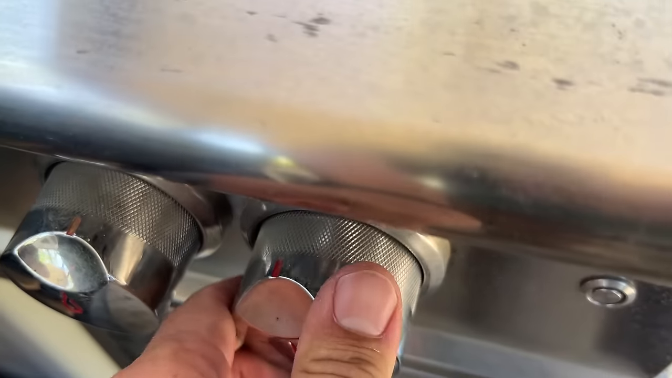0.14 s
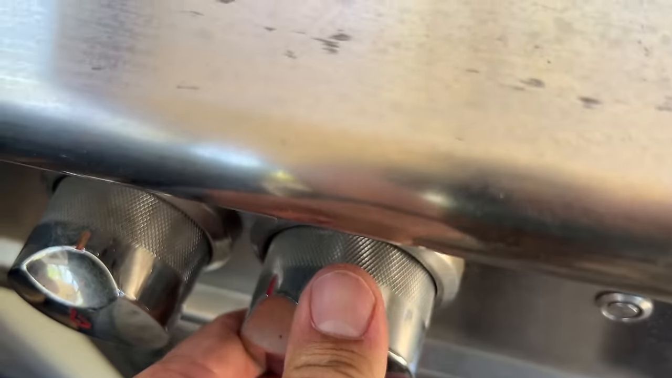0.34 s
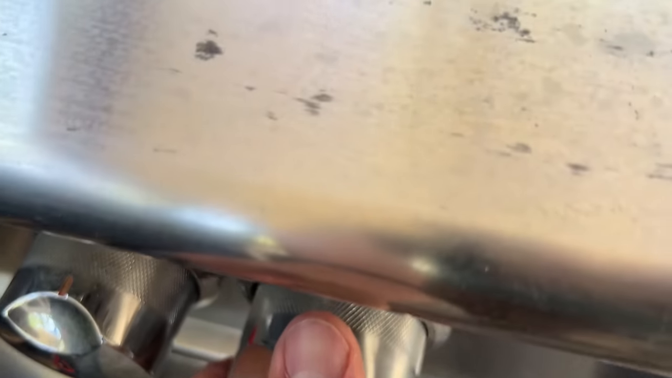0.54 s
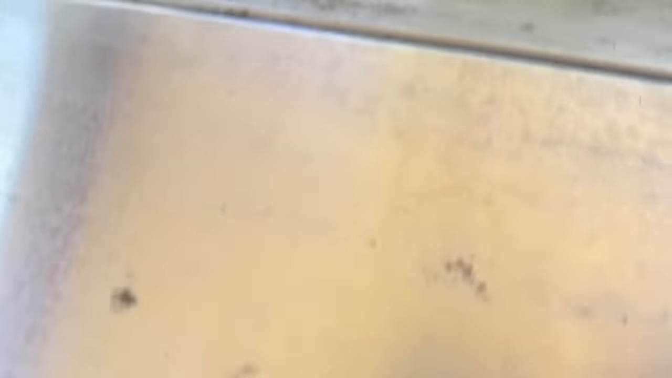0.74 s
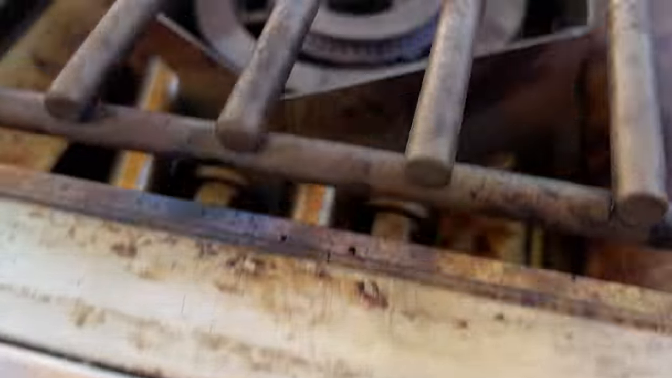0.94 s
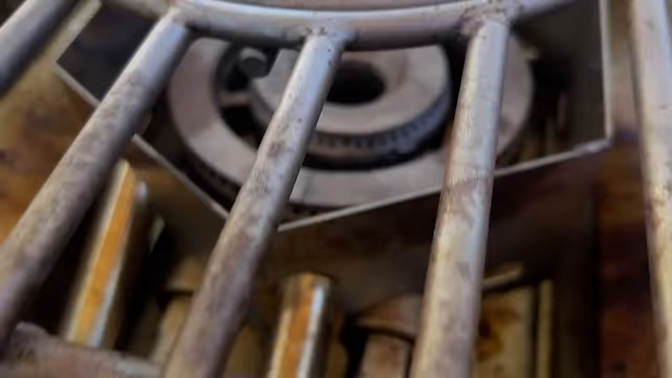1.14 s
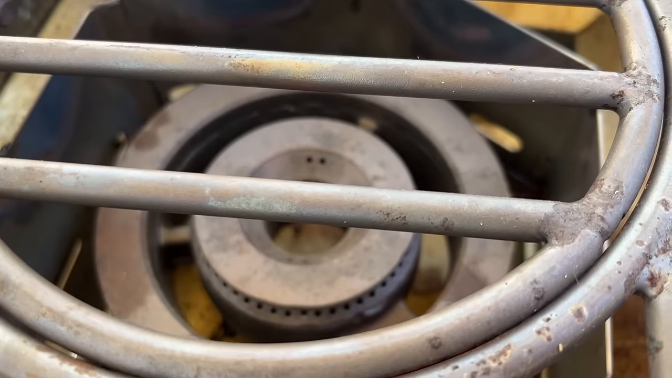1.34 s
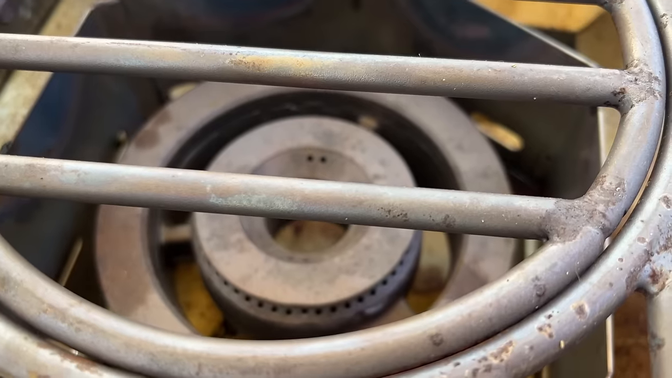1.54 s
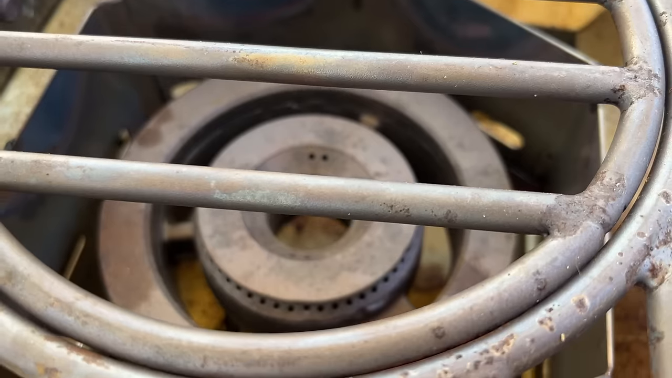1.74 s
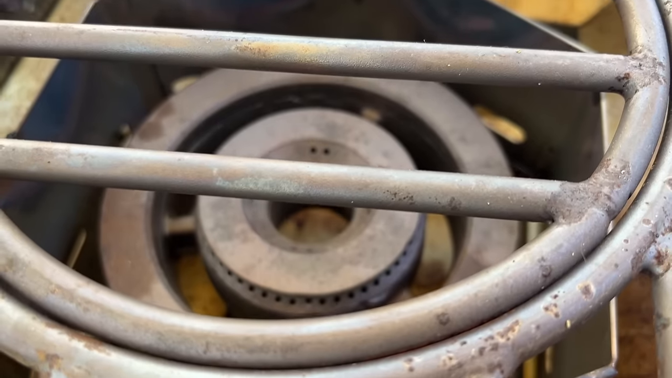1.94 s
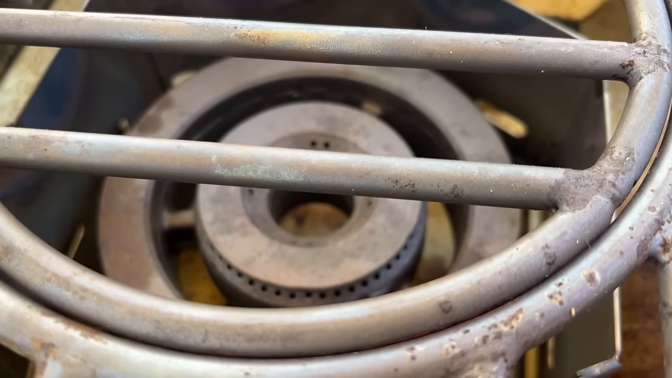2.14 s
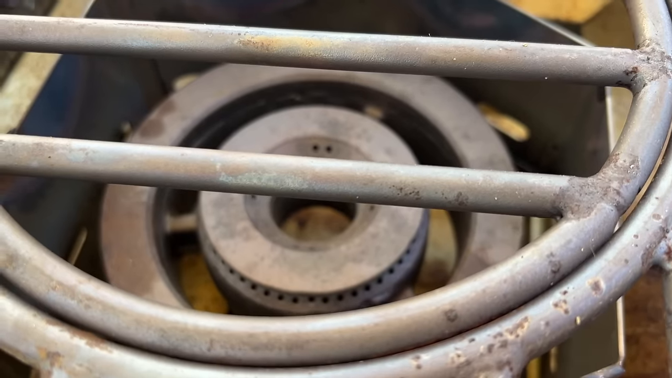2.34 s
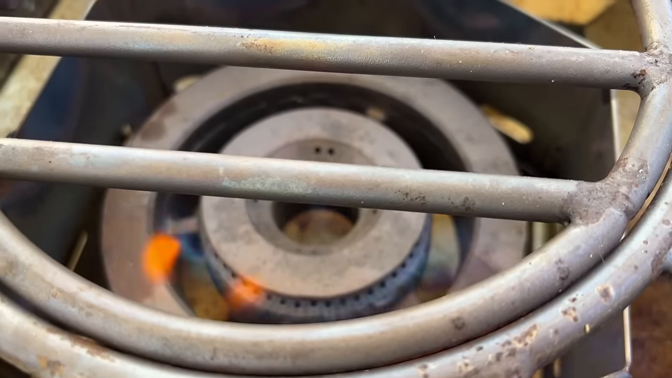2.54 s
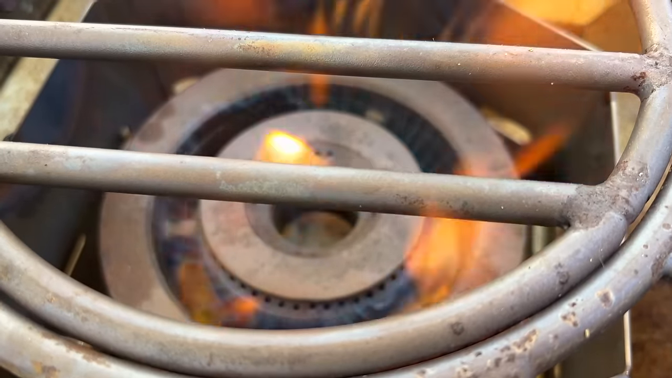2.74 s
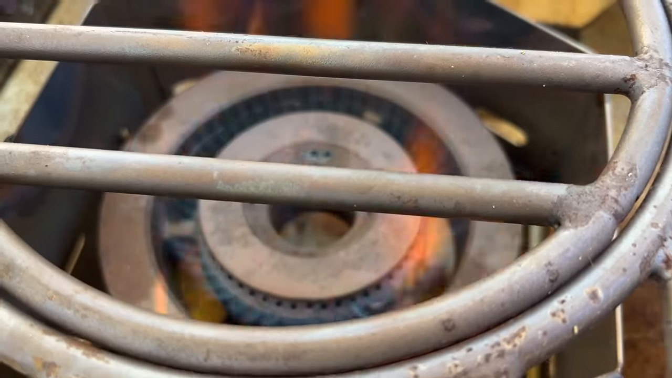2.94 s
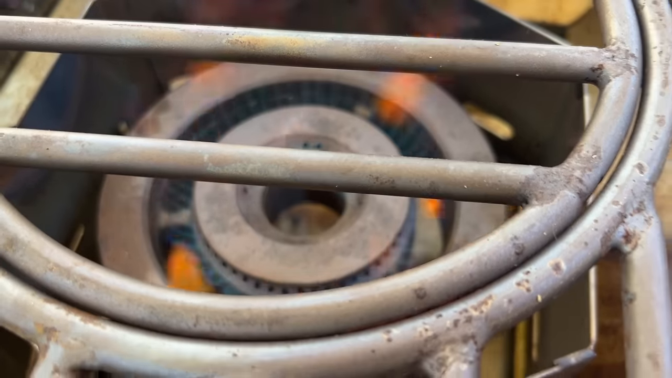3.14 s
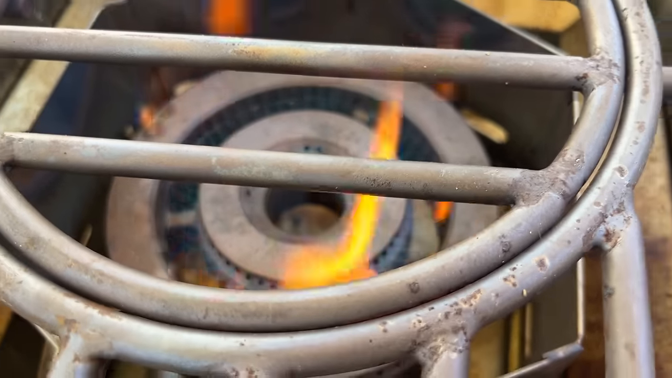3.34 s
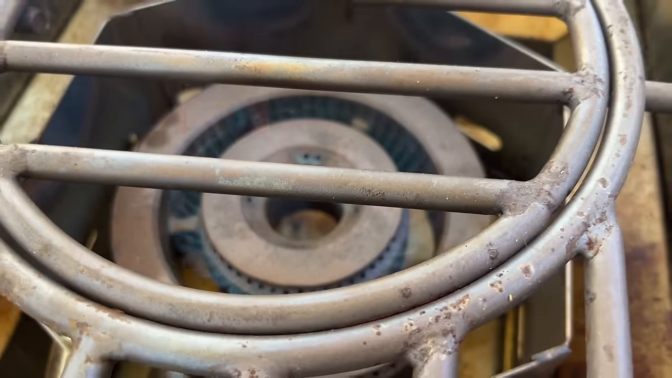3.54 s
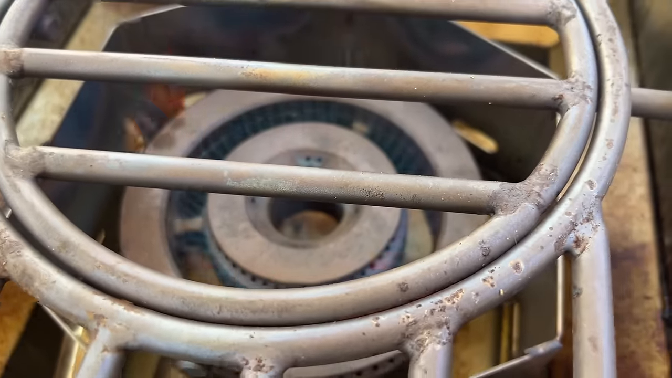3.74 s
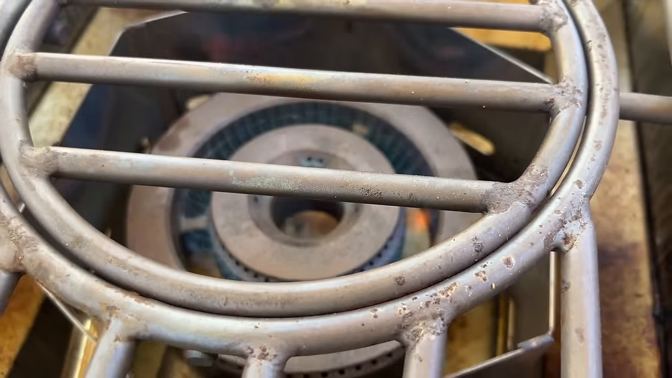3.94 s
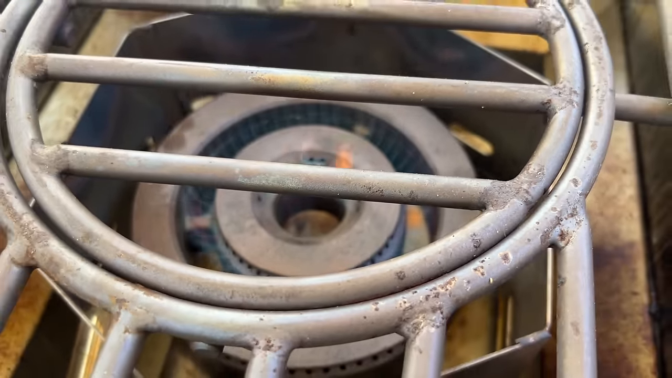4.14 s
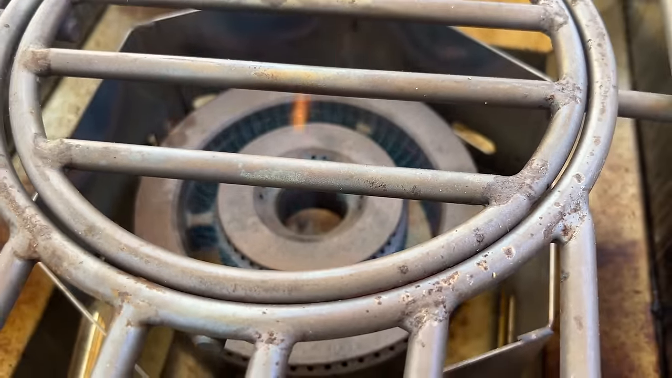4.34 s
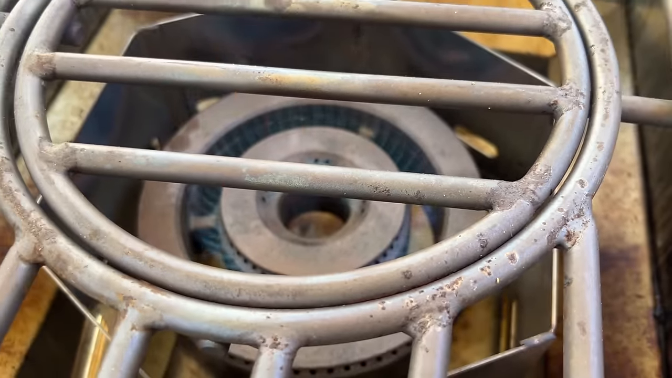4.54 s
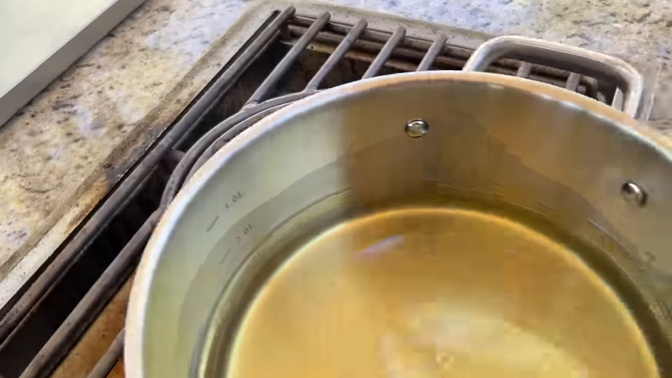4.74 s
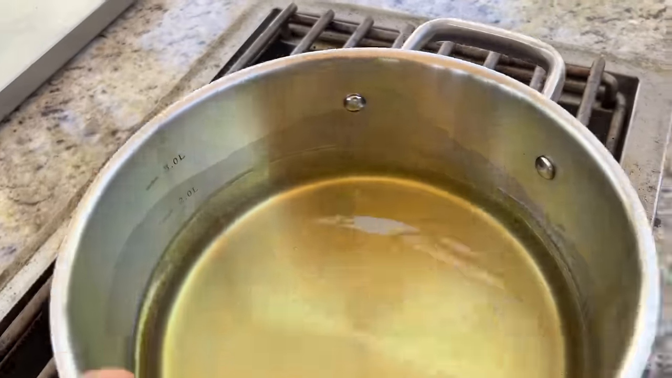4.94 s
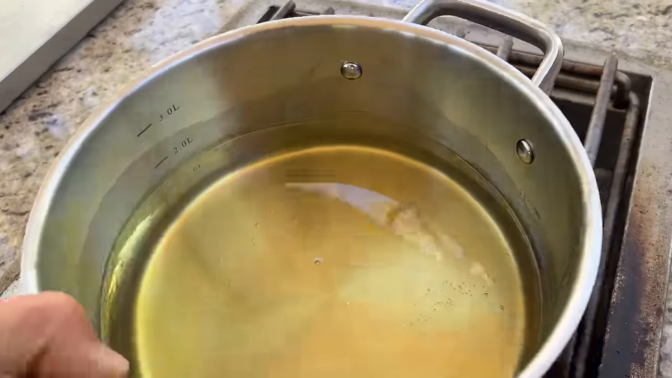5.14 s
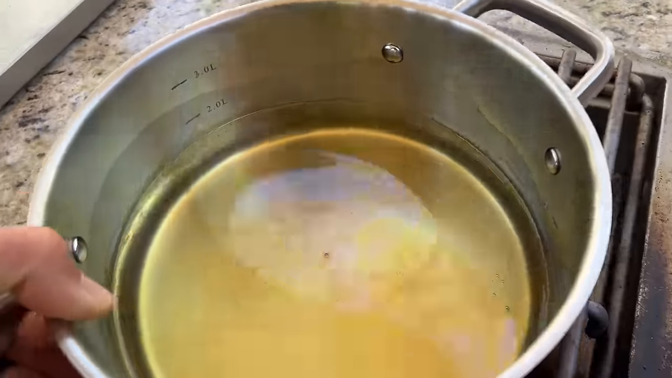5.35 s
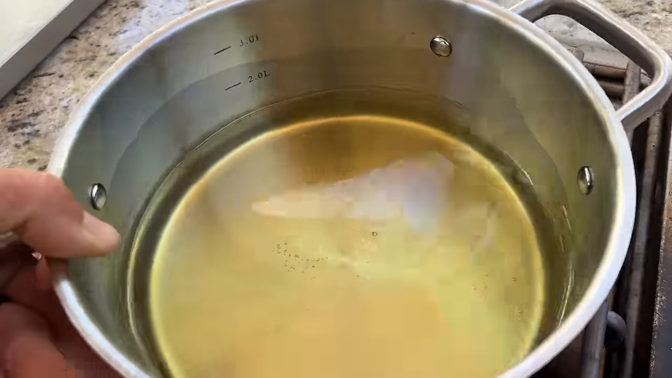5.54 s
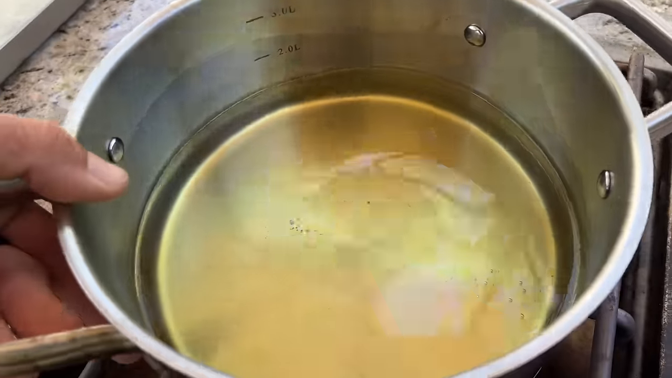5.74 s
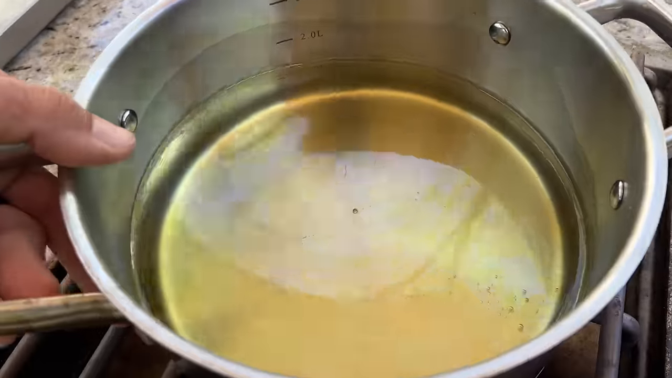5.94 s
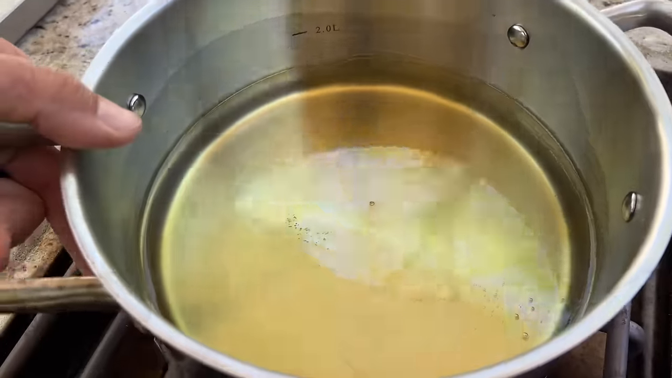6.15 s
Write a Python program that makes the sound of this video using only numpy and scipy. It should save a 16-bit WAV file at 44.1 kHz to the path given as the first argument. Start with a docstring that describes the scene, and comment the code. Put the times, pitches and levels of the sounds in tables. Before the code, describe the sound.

Grill knob thuds and igniter snaps on a steel panel, gas catches with a sharp pop and soft roar, then a pot clangs onto the grate.

```python
"""Outdoors beside a gas grill, a phone held close, far traffic behind: coloured noises for traffic and gas.
The knob knocks on its steel panel and the igniter snaps: rough contacts drive damped modes, treble noise snaps.
The gas catches with a noise crack and two low pops of falling pitch; the flame roars as lumpy noise bands.
Then a pot of oil lands on the grate, bounces and is slid into place: struck and rubbed modes, with held tones."""
import sys
import numpy as np
from scipy import signal
from scipy.fft import rfft, irfft, next_fast_len
from scipy.io import wavfile
from scipy.ndimage import uniform_filter1d, map_coordinates

SR = 44100
rng = np.random.default_rng(int(sys.argv[2]) if len(sys.argv) > 2 else 0)


def bounce(signal):
    """Save signal as a 16-bit WAV file at the path given by the first command-line argument."""
    frames = np.transpose(np.atleast_2d(signal))
    limited = np.clip(frames, -1, 1)
    pcm = np.round(limited * 32767).astype(np.int16)
    wavfile.write(sys.argv[1], SR, pcm)


N = 273711
T = np.arange(N) / SR  # time in seconds

# Modes of the steel panel. Each row: pitch in Hz, level in dB, time to fall 60 dB in seconds.
PANEL_MODES = [(212, -6, 0.19), (335, -0.5, 0.12), (425, -8, 0.14), (555, -5, 0.082), (745, 2.5, 0.021),
               (838, 1.5, 0.04), (919, -3, 0.081), (1176, -11.5, 0.098), (1615, -5.5, 0.046),
               (1925, -4.5, 0.1), (2696, -10.5, 0.064), (3550, -5, 0.035)]
# Modes of the pot. Each row: pitch in Hz, level in dB, time to fall 60 dB in seconds.
POT_MODES = [(302, -9, 0.4), (400, -5, 0.15), (443, -6, 0.15), (536, -3, 0.06), (648, 1, .05),
             (752, -4, 0.14), (935, -8, 0.15), (1170, -6, 0.07), (1210, -14, 0.15), (1552, 2, 0.15),
             (2020, -11, 0.07), (2256, -12, 0.1), (2422, -16, 0.17), (3040, -16, 0.1), (3806, -14, 0.08),
             (4120, -13, 0.09), (4338, -6, 0.07), (5480, -16, .06), (6200, -24, .06), (7500, -22, .06),
             (7930, -16, 0.06)]
# Pot on grate. Each row: start in seconds, level in dB, contact sharpness in Hz,
# lowest pitch set ringing in Hz, rise in seconds.
POT_BUMPS = [(4.928, -6.5, 3080, 200, 0.002115), (4.976, -6.5, 4100, 312, .002),
             (5.05, -15.5, 800, 251, 0.034), (5.113, -20.5, 2490, 700, 0.0069),
             (5.214, -25, 4800, 790, 0.0087)]
# Colour of the pot's scraping and clatter. Each row: frequency in Hz, relative level in dB per Hz.
SCRAPE_COLOUR = [(100, -63), (300, 2), (700, 5.5), (1500, -3.5), (3000, -12), (4500, -13), (6500, -20.5),
                 (8500, -24), (11000, -37), (15500, -37)]


def amp(db):
    """Decibels to an amplitude factor."""
    return 10 ** (np.asarray(db) / 20)


def unit(x):
    """x scaled to rms 1."""
    return x / np.sqrt(np.mean(x ** 2) + 1e-20)


def along(points, hz):
    """Read (Hz, value) points on a log frequency axis."""
    f, v = np.transpose(points)
    return np.interp(np.log(hz + 1), np.log(f + 1), v)


def over_time(points):
    """Read (s, dB) points at every sample; practically silent before the first."""
    s, db = np.transpose(points)
    return np.interp(T, s, db, left=-150, right=db[-1])


def wobble(rate):
    """A smooth random curve with rate knots a second."""
    return map_coordinates(rng.standard_normal(int(N * rate / SR) + 4), [T * rate])


def filtered(x, response):
    """x times a complex response of frequency, padded so that tails do not wrap round."""
    n = x.shape[-1]
    m = next_fast_len(n + SR // 2)
    return irfft(rfft(x, m) * response(np.fft.rfftfreq(m, 1 / SR)), m)[..., :n]


def rush(colour, patchy_db=0, ripple_db=0):
    """Two unrelated coloured noises, rms 1 together, with shared gain patches and a ripple of small resonances."""
    z = signal.stft(rng.standard_normal((2, N)), nperseg=512)[2]
    patches = uniform_filter1d(rng.standard_normal(z.shape[1:]), size=6, axis=0)
    patches = unit(uniform_filter1d(patches, size=8, axis=1))
    pair = signal.istft(z * amp(patchy_db * patches), nperseg=512)[1][:, :N]
    knots = rng.standard_normal(400)  # one every 70 Hz

    def response(hz):
        return amp(along(colour, hz) + ripple_db * map_coordinates(knots, [hz / 70]))
    return unit(filtered(pair, response))


def dying(s, t60, rise_s=1e-5):
    """An envelope that rises from s, then decays 60 dB per t60."""
    return np.clip((T - s) / rise_s, 0, 1) ** 2 * amp(-60 * np.clip(T - s - rise_s, 0, 1) / t60)


def gate(start, end, rise_s, fade_s):
    """A level that fades in and out between two times."""
    return np.clip(np.minimum((T - start) / rise_s, (end - T) / fade_s), 0, 1)


def ringing(x, modes):
    """x drives a bank of damped resonators, one for each mode."""
    def response(f):
        s = 2j * np.pi * f
        total = 0
        for hz, db, t60 in modes:
            turn = 2 * np.pi * hz
            total = total + amp(db) * SR * turn / ((s + np.log(1000) / t60) ** 2 + turn ** 2)
        return total
    return filtered(x, response)


def struck(blows, modes, clatter, touch, contact_s, rattle_db, rattle_t60, clatter_db, clatter_t60):
    """A rough contact, a clean blow and a rattle drive the modes and loose a clatter; soft contacts are dull."""
    out, t = np.zeros((2, 2, N)), T[:SR // 3]
    for s, db, sharp_hz, low_hz, rise_s in blows:
        span = slice(round(s * SR), round(s * SR) + len(t))
        rise = np.minimum(t / rise_s, 1) ** 2
        after = np.maximum(t - rise_s, 0)
        rough = amp(-60 * after / contact_s) + amp(rattle_db - 60 * after / rattle_t60)
        push = rise * rough * rng.standard_normal((2, len(t)))
        # the clean blow, smaller after a slow rise
        push[:, round(rise_s * SR)] += touch / (1 + (rise_s / contact_s) ** 2)
        push = push / np.linalg.norm(push[0])
        loose = rise * amp(clatter_db - 60 * after / clatter_t60) * clatter[:, span]

        def contact(f):
            return (1j * f / (low_hz + 1j * f) / (1 + 1j * f / sharp_hz)) ** 2
        out[..., span] += amp(db) * filtered(np.array([push, loose]), contact)
    return ringing(out[0], modes) + out[1]


def tones(rows, rise_s, fade_s, waver_hz, steady=0, sink_db=0):
    """Narrow noise bands, optionally around a held tone, that swell, waver, sink and fade, a second at most."""
    out = np.zeros((2, N))
    for start, end, hz, width_hz, db, side_db in rows:
        noise = rng.standard_normal((2, 2, SR))
        a, b = filtered(noise, lambda f: 1 / (1 + (2 * f / width_hz) ** 2))
        phase = 2 * np.pi * np.cumsum(hz + waver_hz * wobble(15.1)[:SR]) / SR
        first = round(start * SR)
        count = min(SR, N - first)
        band = unit((unit(a) + steady) * np.cos(phase) + unit(b) * np.sin(phase))[:, :count]
        sinking = amp(-sink_db * np.clip((T - start) / (end - start), 0, 1))
        level = gate(start, end, rise_s, fade_s) * sinking
        out[:, first:first + count] += amp([[db], [db + side_db]]) * level[first:first + count] * band
    return out


def near(x, share, side_db):
    """A close source a little to the left: its side is weaker and partly repeats its mid."""
    return np.array([x[0], amp(side_db) * (share * x[0] + np.sqrt(1 - share ** 2) * x[1])])


def traffic():
    """Far traffic: a low, slightly patchy noise."""
    # Each row: time in seconds, level in dB before the trim below.
    traffic_levels = [(0.0, -33), (0.16, -39), (2.4, -41.5)]
    # Each row: frequency in Hz, relative level in dB per Hz.
    traffic_colour = [(25, -20), (60, -4.5), (200, 1.5), (300, -5.5), (670, -1), (1000, -3), (2000, -10),
                      (3500, -44), (6000, -70)]
    return amp(over_time(traffic_levels) - 2.5) * rush(traffic_colour, patchy_db=1.5, ripple_db=1.5)


def gas():
    """Gas in the jet: turbulent noise hisses, narrow noise bands whistle."""
    # Hiss. Each row: time in seconds, level in dB before the lift below.
    hiss_levels = [(0.0, -52), (0.88, -49.5), (1.81, -52), (4.55, -46.5), (4.8, -45.5), (5.09, -44.5),
                   (5.47, -45), (6.2, -46)]
    # Each row: frequency in Hz, relative level in dB per Hz.
    hiss_colour = [(700, -13.5), (1500, -3.5), (2100, -1), (2800, -1.5), (3400, -7), (4500, -7.5),
                   (6500, -13), (9000, -16), (11000, -19.5), (13000, -25.5), (15700, -26.5), (16000, -60)]
    # Each row: start and end in seconds, pitch in Hz, width in Hz, level in dB, side over mid in dB.
    whistle_rows = [(2.7, 3.25, 7700, 200, -60, -12), (5.2, 5.95, 7520, 152.9, -56.5, -10)]
    hiss = amp(over_time(hiss_levels) + 4) * rush(hiss_colour, patchy_db=1.8, ripple_db=1.8)
    return hiss + tones(whistle_rows, rise_s=0.044, fade_s=.05, waver_hz=0)


def knob():
    """The knob and igniter knock on the panel, ringing its modes; low notes travel slowly and come late."""
    # Blows on the panel. Each row: start in seconds, level in dB, contact sharpness in Hz,
    # lowest pitch set ringing in Hz, rise in seconds.
    knock_rows = [(.001, -23, 870, 350, 0.0011), (.072, -27, 597, 250, 0.0035),
                  (1.423, -16, 1340, 607, 0.0022), (1.499, -29, 1400, 800, 0.0054),
                  (1.517, -21, 450, 300, 0.0065), (1.617, 1.3, 1620, 750, 0.0031),
                  (1.791, -10, 785, 570, 0.00297), (1.895, -25, 330, 239, 0.011),
                  (2.411, -5, 3070, 1390, 0.0018)]
    # The panel's many small modes. Each row: frequency in Hz, relative level in dB per Hz.
    clatter_colour = [(100, -48), (250, 5), (450, -4), (800, -3.5), (1500, -10.5), (2500, -12.5),
                      (4500, -20.5), (15500, -45)]
    late_hz, late_stages = 250, 14  # notes under late_hz are delayed by a chain of all-passes
    knocks = struck(knock_rows, PANEL_MODES, rush(clatter_colour), touch=13, contact_s=.03,
                    rattle_db=-17, rattle_t60=0.56, clatter_db=-2.0, clatter_t60=0.18)
    knocks = filtered(knocks, lambda f: ((late_hz - 1j * f) / (late_hz + 1j * f)) ** late_stages)
    return near(knocks, share=0.089, side_db=-5.0)


def treble_bursts():
    """Short bursts of decaying treble noise: spark and metal snaps, and a few faint later bursts of hiss."""
    # Each row: start in seconds, level in dB.
    burst_rows = [(1.39, -50), (1.471, -17), (1.621, -31), (1.894, -44), (2.411, -14), (4.69, -43.5),
                  (4.85, -44), (5.222, -46)]
    # Each row: frequency in Hz, relative level in dB per Hz.
    burst_colour = [(1000, -7), (2500, -12.5), (4500, -8), (6500, -2.5), (9000, -1), (12000, -6),
                    (16000, -8.5)]
    return sum(amp(db) * dying(s, t60=0.081) for s, db in burst_rows) * rush(burst_colour)


def pops():
    """Pockets of gas pop and the handled or loaded frame thumps: low sines of falling pitch, made in the mid."""
    # Each row: start in seconds, level in dB, start pitch in Hz, end pitch in Hz,
    # length in seconds (loudest a third of the way in).
    pop_rows = [(.01, -47, 58, 50.3, 0.2), (2.461, -12, 265, 57.6, 0.039), (2.463, -17, 66.3, 45, 0.07),
                (2.572, -9, 266, 56, 0.016), (4.92, -44, 61, 45, 0.11), (5.099, -38, 55, 45.4, 0.13)]
    out = np.zeros((2, N))  # a little of the mid reaches the side later
    for s, db, start_hz, end_hz, length in pop_rows:
        u = np.clip(T - s, 0, 1) / length
        hz = end_hz + (start_hz - end_hz) * np.exp(-3 * u ** 3)
        phase = 2 * np.pi * np.cumsum(hz * (T >= s)) / SR
        out[0] += amp(db) * 3 * u * np.exp(1 - 3 * u) * np.sin(phase)
    return out


def ignition():
    """The gas catches: a crackling burst of noise with a slower tail shakes the panel's higher modes."""
    # Each row: frequency in Hz, relative level in dB per Hz.
    crack_colour = [(150, -33), (450, -21), (1000, -3), (1750, 2), (3000, -4), (4500, -12.5), (6500, -17),
                    (16000, -28)]
    catch_s, hold_s, catch_db = 2.414, 0.022, -17.5  # full level from catch_s, for hold_s
    rise_db_per_s, fall_db_per_s = 1302, 387
    level_db = catch_db - rise_db_per_s * np.maximum(catch_s - T, 0)
    level_db = level_db - fall_db_per_s * np.maximum(T - catch_s - hold_s, 0)
    tail = amp(-36) * dying(catch_s + hold_s, t60=0.33, rise_s=hold_s)
    crackle = amp(2.9 * wobble(400))
    burst = (amp(level_db) + tail) * crackle * rush(crack_colour, patchy_db=-1.0)
    shaken = [mode for mode in PANEL_MODES if mode[0] > 1450]
    return burst + amp(-39) * ringing(burst, shaken)


def flame():
    """Turbulent burning: a lumpy roar, a flutter that shares its lumps, and small jets at the burner holes."""
    # Roar. Each row: time in seconds, level in dB.
    roar_levels = [(2.42, -39), (2.472, -18), (2.53, -26.5), (2.67, -31), (3.12, -30.5), (3.27, -35),
                   (4.5, -28), (4.72, -31), (4.9, -35), (4.95, -27.5), (5.25, -32.5), (5.42, -29.5),
                   (5.55, -23.5), (6.2, -31.5)]
    # Roar. Each row: frequency in Hz, relative level in dB per Hz.
    roar_colour = [(25, -31), (60, -14), (150, -4.5), (270, 2), (350, -10), (410, -4), (470, -15),
                   (540, -8.5), (900, -27), (1500, -90)]
    # Flutter. Each row: frequency in Hz, relative level in dB per Hz.
    flutter_colour = [(150, -63), (250, -11), (420, -17.5), (530, -0.5), (700, -1), (1000, -9), (1500, -14),
                      (3000, -34), (6000, -92)]
    # Burner holes. Each row: time in seconds, level in dB before the lumps.
    jet_levels = [(2.5, -38.5), (2.94, -48), (3.4, -49), (3.9, -42), (4.6, -40.5), (4.9, -48)]
    # Burner holes. Each row: frequency in Hz, relative level in dB per Hz.
    jet_colour = [(800, -73), (1300, -5), (1650, -12), (1980, 11), (2120, 4.5), (2380, 2.5), (2650, -9.5),
                  (3400, -20), (6000, -73.5)]
    roar_db = over_time(roar_levels)
    lumps = wobble(30)
    swell_db = .4 * wobble(9.7)
    roar = unit(amp(0.39 * lumps + swell_db) * rush(roar_colour, patchy_db=1.04))
    flutter = unit(amp(1.44 * lumps + 1.94 * wobble(70)) * rush(flutter_colour, patchy_db=-0.55))
    # the flutter is at -35 dB when the roar is at -30.5 dB, and follows its swings
    flutter_level = (T >= roar_levels[0][0]) * amp(-35 + (roar_db + 30.5))
    jets = amp(over_time(jet_levels) + lumps) * rush(jet_colour, patchy_db=3.5, ripple_db=2.5)
    return amp(roar_db) * roar + flutter_level * flutter + jets


def pot_landing():
    """The pot lands and bounces on the grate: each contact rings its modes and clatters."""
    return struck(POT_BUMPS, POT_MODES, rush(SCRAPE_COLOUR), touch=22, contact_s=0.019,
                  rattle_db=-9.5, rattle_t60=0.074, clatter_db=-2.0, clatter_t60=0.058)


def pot_sliding():
    """The pot rubs over the bars in uneven slips: rough noise bows its modes and scrapes."""
    drag_s, drag_db, drag_fall_db_per_s = 4.93, -23, 16.5  # the slow drag into place
    rub_db, rub_t60 = -9.5, 0.21  # each bump sets the pot rubbing, this far below the bump
    slips = amp(3.6 * wobble(120)) * rng.standard_normal((2, N))
    # rubbed modes are more even in level and slightly shorter than struck ones
    bowed = unit(ringing(slips, [(hz, db / 2, 0.94 * t60) for hz, db, t60 in POT_MODES]))
    scrape = unit(amp(2.66 * wobble(200)) * rush(SCRAPE_COLOUR, patchy_db=4.0, ripple_db=4.0))
    level = (T >= drag_s) * amp(drag_db - drag_fall_db_per_s * (T - drag_s))
    for s, db, _, _, rise_s in POT_BUMPS:
        level = level + amp(db + rub_db) * dying(s, rub_t60, rise_s)
    return level * (amp(-5.0) * bowed + amp(0.5) * scrape)


def singing():
    """A struck or rubbed pot holds some of its modes, often several at once, as rough, broken, wavering tones."""
    # Each row: start and end in seconds, pitch in Hz (moved to the nearest mode),
    # level in dB at the start, before the breaks.
    sung_rows = [(4.922, 4.96, 4340, -24), (5.02, 5.11, 1700, -21), (5.12, 5.17, 1552, -33),
                 (5.063, 5.27, 3808, -28.5), (5.072, 5.29, 2422, -29.5), (5.04, 5.26, 1212, -26),
                 (5.27, 5.36, 1212, -27), (5.18, 5.29, 700, -26), (5.31, 5.4, 700, -27),
                 (5.35, 5.47, 752, -23), (5.27, 5.99, 3808, -46.5), (5.28, 5.8, 4340, -49.5),
                 (5.55, 5.9, 2422, -43.5), (5.7, 5.95, 5500, -55)]
    rows = []
    for start, end, hz, db in sung_rows:
        mode_hz = min((mode[0] for mode in POT_MODES), key=lambda f: abs(f - hz))
        # low notes under about 900 Hz and long holds spread wider
        width_hz = 60 * (1 + (900 / hz) ** 4 + 2 * (end - start))
        rows.append((start, end, mode_hz, width_hz, db, 0))
    breaks = amp(1.5 * wobble(45))
    return breaks * tones(rows, rise_s=.012, fade_s=.035, waver_hz=10, steady=1.8, sink_db=4.5)


def scene():
    """All sources at the phone, as two rows: the mid and the side."""
    background = traffic() + gas()
    panel = knob() + treble_bursts()
    catching = near(pops() + ignition(), share=0.077, side_db=-3.0)
    burning = near(flame(), share=0.033, side_db=-8.0)
    metal = near(pot_landing() + pot_sliding() + singing(), share=0.086, side_db=-6.0)
    return background + panel + catching + burning + metal


def record(dry):
    """The phone's microphones share mid and side by frequency, lean left, clip softly and limit the band."""
    # Stereo width. Each row: frequency in Hz, side over mid in dB before the two bells below.
    width_points = [(300, -13), (700, -0.5), (1200, 3.5), (2200, 1), (3300, 3.5), (4300, -0.5),
                    (12000, 1.5), (16000, 19)]
    # Share of the side that repeats the mid. Each row: frequency in Hz, share in step,
    # share a quarter cycle ahead, both before the cut of 6 dB below.
    echo_rows = [(200, 0.085, 0.56), (900, 0.22, 0.11), (1300, 0.03, .15), (2010, -0.59, -0.16),
                 (3000, -0.37, 0.39), (4200, 0.22, 0.25), (6500, 0.59, -0.41), (9000, -0.081, 0)]
    echo_hz, in_step, ahead = np.transpose(echo_rows)

    def bell(hz, centre_hz, width_hz):
        return np.exp(-((hz - centre_hz) / width_hz) ** 4)

    def turn(hz):
        width_db = along(width_points, hz)
        width_db = width_db + 28.5 * bell(hz, 10030, 910)  # the mid is nearly empty around here
        width_db = width_db - 40 * bell(hz, 13700, 1350)  # the side is nearly empty around here
        return np.arctan(amp(width_db))

    def side_mix(hz):
        echo = along(np.c_[echo_hz, in_step], hz) + 1j * along(np.c_[echo_hz, ahead], hz)
        own = np.sqrt(np.clip(1 - np.abs(echo) ** 2, 0, 1))
        return np.array([amp(-6) * echo, own])

    def lean(hz):
        lean_db = 0.59 / (1 + (hz / 6000) ** 2)  # left a little louder below the treble
        return amp([lean_db, -lean_db])

    dry = np.array([dry[0], filtered(dry, side_mix).sum(axis=0)])
    mid, side = filtered(dry, lambda hz: np.array([np.cos(turn(hz)), np.sin(turn(hz))]))
    x = filtered(np.array([mid + side, mid - side]), lean)
    x = x / (1 + np.abs(x) ** 6) ** (1 / 6)
    return filtered(x, lambda hz: hz < 16500)


dry = scene()
out = record(dry)
bounce(out)
```